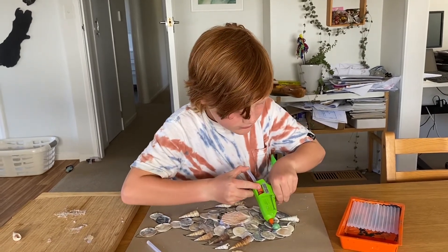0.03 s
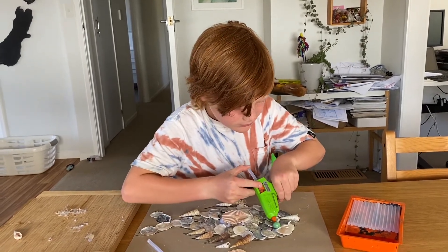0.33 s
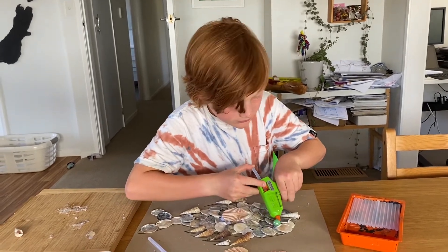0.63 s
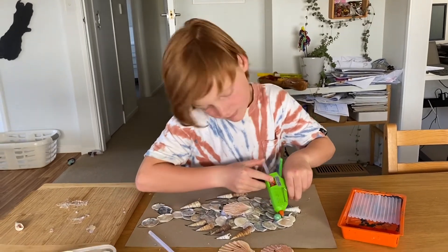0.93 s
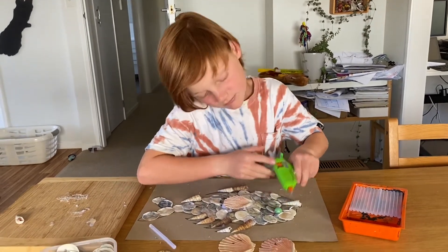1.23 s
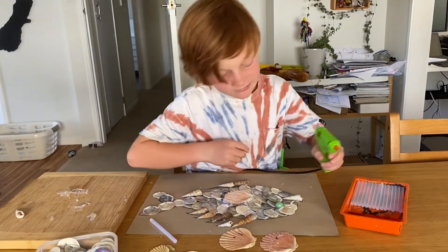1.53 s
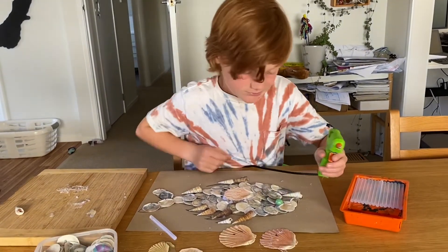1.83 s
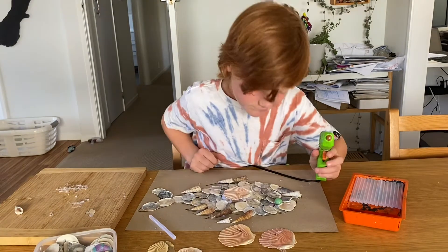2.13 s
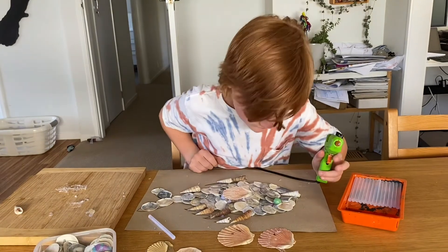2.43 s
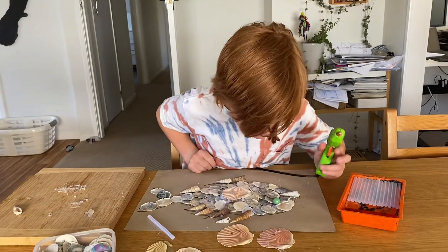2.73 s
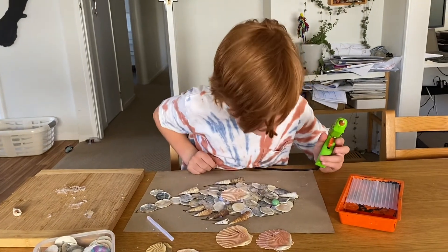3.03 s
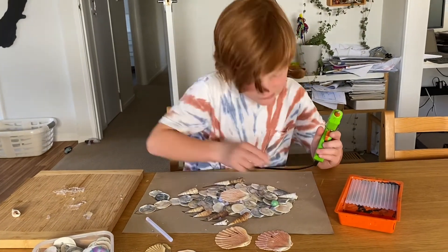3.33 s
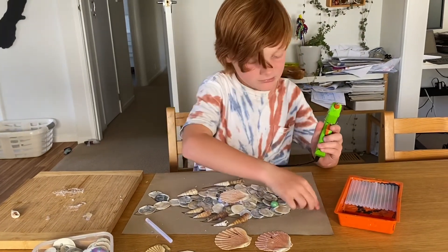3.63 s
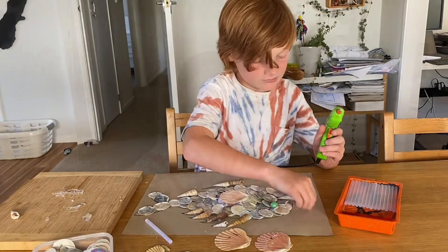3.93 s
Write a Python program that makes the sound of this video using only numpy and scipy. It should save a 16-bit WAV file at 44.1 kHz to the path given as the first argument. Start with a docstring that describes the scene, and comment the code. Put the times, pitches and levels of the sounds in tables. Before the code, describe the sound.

Glue gun handled with a click and table knocks, followed by light scraping of shells.

```python
"""Glue gun over a shell collage

A child handles a glue gun in a quiet living room; an appliance hums, a distant motor drones.
The plastic trigger clicks, the gun knocks twice on the wooden table, clothes rustle, then a hand
brushes the paper and nudges the shells. Hits are noise bursts and ringing modes; rubs are tiny slips."""
import sys
import numpy as np
from scipy import signal
from scipy.fft import rfft, irfft
from scipy.io import wavfile
from scipy.ndimage import uniform_filter1d

SR = 44100
rng = np.random.default_rng(int(sys.argv[2]) if len(sys.argv) > 2 else 0)


def store_wav(level_fs):
    """Save 16-bit WAV to argv[1]."""
    pcm = np.round(np.clip(np.atleast_2d(level_fs), -1, 1) * 32767)
    wavfile.write(sys.argv[1], SR, pcm.T.astype(np.int16))


N = 176400
TIME_S = np.arange(N) / SR

# Background noise spectra. Each row: frequency in Hz, density in dB per Hz.
AIR_SPECTRUM = [(28, -97), (42, -72), (60, -73), (90, -79), (130, -85), (180, -88), (260, -88), (400, -94),
                (600, -102), (1000, -108), (1550, -106), (1675, -103), (1800, -106), (2050, -109),
                (2600, -117), (4500, -117), (9000, -118), (11000, -122), (15500, -134)]
HISS_SPECTRUM = [(4000, -140), (5200, -114), (5900, -104), (7500, -103), (8500, -107), (9800, -124),
                 (12000, -140)]
# Left-right likeness of the noise. Each row: frequency in Hz, coherence from 0 to 1.
NOISE_COHERENCE = [(60, 1), (130, 0.7), (300, 0.83), (700, 0.39), (1500, 0.073), (3000, 0.45), (7000, 0.54)]
# Hiss and motor envelopes. Each row: time in seconds, gain in dB.
HISS_GAIN_DB = [(0, 0.5), (.4, -2), (.67, 3), (.8, -1), (1.25, 1.5), (1.33, -7.5), (1.55, -4.5),
                (2.05, 0.5), (2.17, -5), (2.65, 0), (2.85, -1.5), (3.05, 3.5), (3.17, -2), (3.32, 4),
                (3.41, -4.5), (3.5, 1.5), (4, -3.5)]
MOTOR_GAIN_DB = [(0, -43), (.3, -47.5), (.45, -58), (.56, -50), (.7, -40.5), (.85, -39), (1.25, -40.5),
                 (1.6, -45.5), (1.88, -43), (2.2, -49.5), (2.6, -48.5), (3.25, -45.5), (3.6, -63.5),
                 (3.8, -51.5), (4, -54.5)]
# Motor pitch. Each row: time in seconds, frequency in Hz.
MOTOR_PITCH_HZ = [(0, 54.88), (.5, 56.11), (.9, 57.22), (1.2, 56.93), (1.5, 57.59), (1.9, 57.48),
                  (2.2, 58.5), (2.9, 59), (3.15, 60.64), (4, 60.97)]

# Rubbing strokes. Each row: peak time, 1/e rise and 1/e fall in seconds, level in dB.
FINGER_STROKES = [(3.562, 0.0092, 0.023, -48)]
PAPER_STROKES = [(3.606, 0.035, 0.053, -54), (3.995, 0.028, 0.031, -67)]
SHELL_STROKES = [(3.705, 0.071, 0.079, -60), (3.74, 0.0079, 0.026, -64), (3.812, 0.012, 0.041, -59),
                 (3.886, 0.021, 0.019, -53.5), (3.915, 0.016, 0.0071, -54.5)]
# Sleeve strokes. Each row: as above, then low-pass cutoff in Hz.
SLEEVE_STROKES = [(.08, 0.07, .04, -67, 4890), (.26, 0.072, 0.033, -68, 6500),
                  (.35, 0.039, 0.021, -65, 3450), (0.449, 0.034, 0.021, -68, 8040),
                  (.86, 0.037, 0.13, -68, 7500), (1.36, 0.033, 0.027, -72, 9200),
                  (1.66, 0.11, 0.15, -64.5, 7960), (1.786, 0.054, 0.064, -60, 11100),
                  (2.7, 0.05, 0.063, -64, 4700), (2.85, 0.013, 0.093, -66.5, 10850),
                  (3.016, 0.028, 0.046, -61.5, 20270), (3.231, 0.067, 0.08, -70, 13500)]
# Arms on the table. Each row: start in seconds, level in dB, pitch in Hz.
ARM_BUMPS = [(0.824, -22.5, 128), (1.541, -22, 107), (1.785, -15, 78.7), (3.44, -16.5, 76.1)]
# Small ticks. Each row: start in seconds, level in dB, pitch in Hz, width in octaves.
SMALL_TICKS = [(.002, -26.5, 1840, 0.12), (0.217, -42.5, 1180, .2), (.29, -45.5, 4730, 0.25),
               (0.8278, -37.5, 3900, 0.62), (.988, -43, 1700, 0.57), (1.223, -45.5, 2080, 0.62),
               (1.449, -44.5, 4417, 0.34), (1.488, -45.5, 2080, 0.4)]
# Shell contacts. Each row: start in seconds, level in dB, pitch ratio.
SHELL_HITS = [(3.558, -27, 1.2), (3.706, -40, 1.5), (3.7296, -27.5, 1.02), (3.7927, -30.5, 1.08),
              (3.887, -32, 0.75), (3.915, -33, 1.03)]
# Gun on the table. Each row: start in seconds, body and edge levels in dB, body pitch ratio.
GUN_KNOCKS = [(2.3040, -23, -18.5, 2), (2.3066, -17, -22, 1.25), (2.3313, -20, -40, 0.91),
              (2.348, -20, -21, 1.13), (2.3490, -7.5, -23, 0.9), (2.361, -23.5, -38, 0.67),
              (2.376, -19.5, -36, 0.81)]
# Trigger contacts. Each row: start in seconds, level in dB, low-pass cutoff in Hz.
TRIGGER_CLICKS = [(1.5329, -13, 16700), (1.5369, -26, 8950), (1.549, -37, 6000), (2.222, -31.5, 7200)]

# Friction and impact spectra. Each row: frequency in Hz, relative level in dB.
CLOTH_SPECTRUM = [(200, 4), (800, -6), (1700, -0.5), (2500, -2), (4000, -1.5), (5200, -4), (7000, -5.5),
                  (11500, -1), (15000, -4.5)]
FINGER_SPECTRUM = [(200, -15), (550, 2), (800, -9), (1700, -1.5), (3200, 1), (4000, 0), (5200, -2),
                   (7000, -2.5), (9000, -4), (11500, -1), (15000, -9)]
PAPER_SPECTRUM = [(200, -8), (800, -4), (1100, 1), (1800, 1.5), (2500, 1), (3300, -4.5), (5200, -12.5),
                  (15000, -12)]
SHELL_SPECTRUM = [(300, -25), (1100, -19), (1700, -7), (2500, -15.5), (3200, 0), (4000, 0.5), (5200, -3.5),
                  (7000, -2.5), (9000, -2), (11500, 2), (15000, -2)]
KNOCK_BODY_SPECTRUM = [(60, -4), (160, -8), (350, -8), (560, 4), (800, 1), (1100, -5), (1700, -7),
                       (2500, -26), (4000, -19.5), (7000, -48)]
KNOCK_EDGE_SPECTRUM = [(200, -11), (600, -1), (1100, -5), (1950, 4), (2500, -6.5), (3200, -6), (4200, -13),
                       (5200, -15), (7000, -20.5), (9000, -20.5), (11500, -16.5), (15000, -22)]
PLASTIC_SPECTRUM = [(300, -32), (780, -13), (1060, 2.5), (1700, -3.5), (2500, -6.5), (3200, -7.5),
                    (4000, 2.5), (5200, -8), (7000, -7.5), (9000, -2), (11500, -6), (15000, -3)]
# Resonances. Each row: frequency in Hz, relative level in dB, T60 in seconds.
SHELL_MODES = [(3620, -4, .07), (4260, -3, 0.062), (3876, -1, 0.058), (4870, -6, 0.033), (6800, -7, 0.027),
               (11300, -2, 0.016)]
TABLE_MODES = [(215, -5, .16), (285, -4, .1), (480, 0, .11), (557, 1, .11), (630, 2, .1), (666, 0, .13),
               (750, -1, .11), (861, -1, .08), (940, -2, .08), (1120, 0, .1), (1440, -7, .08),
               (1830, -5, .06)]
PLASTIC_MODES = [(1060, 0, .05), (1180, 1, .07), (1270, -2, .06), (1580, 0, .05), (1782, -2, .05),
                 (3690, 2, .01), (3890, 3, .01), (4230, 4, .01)]

# Room decay. Each row: frequency in Hz, T60 in seconds.
REVERB_T60_S = [(150, .34), (600, .29), (2000, .33), (4000, .3), (12000, .26)]
# Reverb spectrum. Each row: frequency in Hz, gain in dB.
REVERB_GAIN_DB = [(100, -7), (600, -3.5), (1000, -1.5), (1600, -3), (3000, -3), (4000, -6), (5000, -2),
                  (7000, -1.5), (10000, -1), (15000, -20)]
# Direction of the hits. Each row: frequency in Hz, left phase lag in radians.
LEFT_LAG_RAD = [(400, 0.47), (750, 1.4), (1300, 1.5), (1900, 0.84)]
# Stereo width. Each row: frequency in Hz, side gain as a factor.
MIC_WIDTH = [(100, .55), (500, .85), (1100, 1.5), (2500, .6), (6000, .55), (7500, .2), (8800, .08),
             (15000, .1)]
# Stereo balance. Each row: frequency in Hz, left over right in dB.
MIC_BALANCE_DB = [(50, 2), (300, 4.5), (700, 3), (1300, 0), (2000, 0), (3000, 5.5), (4800, 5), (6200, 3.5),
                  (8500, 3.5), (15000, -2)]


def amp(db):
    """dB to amplitude."""
    return 10 ** (np.asarray(db) / 20)


def at_hz(table, hz):
    """Table lookup over log frequency."""
    row_hz, values = np.transpose(table)
    return np.interp(np.log(hz + 1), np.log(row_hz + 1), values)


def over_time(table):
    """Table interpolated per sample."""
    return np.interp(TIME_S, *np.transpose(table))


def shifted(table, ratio):
    """Table with frequencies scaled."""
    return [(hz * ratio, *rest) for hz, *rest in table]


def unit(x):
    """Scale to energy 1."""
    return x / np.sqrt(np.sum(x ** 2, -1, keepdims=True) + 1e-20)


def add(mix, start_s, sound):
    """Mix in place."""
    part = mix[max(round(start_s * SR), 0):][:len(sound)]
    part += sound[:len(part)]


def lowpass(x, cutoff_hz):
    """Second-order treble roll-off."""
    return signal.lfilter(*signal.butter(2, min(cutoff_hz, SR / 2 - 500), fs=SR), x)


def colour(x, spectrum, size=2048):
    """Minimum-phase filter of energy 1."""
    log_gain = np.log(amp(at_hz(spectrum, abs(np.fft.fftfreq(size, 1 / SR)))))
    taps = np.fft.ifft(np.exp(np.conj(signal.hilbert(log_gain)))).real
    return signal.fftconvolve(x, unit(taps))[:len(x)]


def burst(spectrum, decay_s):
    """Contact chatter: milliseconds of noise, whitened, then coloured; energy 1."""
    age = TIME_S[:SR // 2] / decay_s
    bins = rfft(rng.standard_normal(len(age)) * np.sqrt(age) * np.exp(-1.3 * age))
    chatter = irfft(bins / abs(bins), len(age)) * np.exp(-.3 * age)
    return unit(colour(chatter, spectrum))


def ring(modes):
    """Decaying modes of a struck object; energy 1."""
    t = TIME_S[:SR // 2]
    return unit(sum(rng.choice([-1, 1]) * amp(db - 60 * t / t60_s) * np.sin(2 * np.pi * hz * t)
                    for hz, db, t60_s in modes))


def friction(strokes, spectrum, slips_per_s, spread_db, catch_db, catch_s=0.0065):
    """Tiny uneven slips, clumped as the surface catches and lets go."""
    slips = rng.standard_normal(N) * amp(spread_db * np.minimum(rng.exponential(1, N), 4))
    slips *= rng.random(N) < slips_per_s / SR
    slips *= amp(catch_db * np.interp(TIME_S / catch_s, np.arange(N), rng.uniform(-1.03, 1, N)))
    power = sum(amp(db) ** 2 * np.exp(-2 * np.maximum((peak_s - TIME_S) / rise_s, (TIME_S - peak_s) / fall_s))
                for peak_s, rise_s, fall_s, db in strokes)
    return colour(unit(slips) * np.sqrt(N * power), spectrum)


def room_noise(spectrum, patch_db, steady_below_hz=900):
    """Stereo noise with faint drifting patches, steadier in the bass."""
    hz, _, (left, spare) = signal.stft(rng.standard_normal((2, N)), SR, nperseg=2048)
    coherence = np.clip(at_hz(NOISE_COHERENCE, hz), 0, 1)[:, None]
    right = coherence * left + np.sqrt(1 - coherence ** 2) * spare
    patches = uniform_filter1d(uniform_filter1d(rng.standard_normal(left.shape), 50, 0), 9, 1)
    depth_db = patch_db * np.minimum(hz / steady_below_hz, 1)[:, None]
    gain = amp(at_hz(spectrum, hz)[:, None] + depth_db * patches / patches.std())
    return signal.istft(np.array([left, right]) * gain, SR, nperseg=2048)[1][:, :N] * np.sqrt(SR / 2)


def whine(pitch_hz=1673, half_width_hz=6, level_db=-80, fade_db_per_s=1.5):
    """Faint wavering tone of narrow-band noise."""
    peak = 1 / (1 + ((np.fft.rfftfreq(N, 1 / SR) - pitch_hz) / half_width_hz) ** 2)
    band = unit(irfft(rfft(rng.standard_normal(N)) * peak, N))
    return amp(level_db - fade_db_per_s * TIME_S) * np.sqrt(N) * band


def motor_drone():
    """Distant motor: a deep sine, slowly rising in pitch."""
    phase_rad = 2 * np.pi * np.cumsum(over_time(MOTOR_PITCH_HZ)) / SR
    return np.sqrt(2) * amp(over_time(MOTOR_GAIN_DB)) * np.sin(phase_rad)


def appliance_hum(pitch_hz=48.84, level_db=-52.5, throb_hz=1.73, throb_depth=0.45):
    """Throbbing sine that beats against the drone."""
    throb = 1 + throb_depth * np.cos(2 * np.pi * throb_hz * TIME_S)
    return np.sqrt(2) * amp(level_db) * throb * np.sin(2 * np.pi * pitch_hz * TIME_S)


def reverb(x, early_db, wet_db, early_s=0.0061, gap_s=0.00151):
    """Quick table reflections and a short diffuse tail, different per side."""
    t = TIME_S[:SR // 2]
    onset = np.clip(t / gap_s - 1, 0, 1) * (1 + amp(early_db) * np.exp(-t / early_s))
    bins = rfft(rng.standard_normal((2, len(t))) * np.exp(-t / .06))
    diffuse = irfft(bins / abs(bins), len(t))
    diffuse /= np.sqrt(uniform_filter1d(diffuse ** 2, size=800, axis=1))  # flat envelope
    hz, age_s, frames = signal.stft(diffuse, SR, nperseg=256)
    frames *= amp(-60 * age_s / at_hz(REVERB_T60_S, hz)[:, None])
    tails = unit(signal.istft(frames, SR, nperseg=256)[1][:, :len(t)] * onset)
    rms_gain = np.sqrt(np.mean(amp(at_hz(REVERB_GAIN_DB, np.linspace(0, SR / 2, 512))) ** 2))
    wet = np.array([signal.fftconvolve(x, colour(tail, REVERB_GAIN_DB))[:N] for tail in tails])
    return amp(wet_db) * rms_gain * wet


def from_right(x):
    """Direct sound reaches the right side first."""
    lag_rad = at_hz(LEFT_LAG_RAD, np.fft.rfftfreq(2 * N, 1 / SR))
    left = irfft(rfft(x, 2 * N) * np.exp(-1j * lag_rad))[:N]
    return np.array([left, x])


def sleeve_rustle():
    """Cloth friction, low-passed per stroke."""
    out = np.zeros(N)
    for *stroke, cutoff_hz in SLEEVE_STROKES:
        rustle = friction([stroke], CLOTH_SPECTRUM, slips_per_s=9000, spread_db=2, catch_db=6)
        out += lowpass(rustle, cutoff_hz)
    return out


def hand_on_collage():
    """Fingers land and drag on paper; shells scrape."""
    brush = friction(FINGER_STROKES, FINGER_SPECTRUM, slips_per_s=10000, spread_db=1.5, catch_db=4)
    drag = friction(PAPER_STROKES, PAPER_SPECTRUM, slips_per_s=3500, spread_db=0, catch_db=3)
    scrape = friction(SHELL_STROKES, SHELL_SPECTRUM, slips_per_s=5400, spread_db=0, catch_db=1)
    return brush + drag + scrape


def arm_bumps(decay_s=0.011):
    """Arms meet the table: soft, low damped sines."""
    out, t = np.zeros(N), TIME_S[:SR // 3]
    for start_s, db, hz in ARM_BUMPS:
        add(out, start_s, amp(db) * unit(t * np.exp(-t / decay_s) * np.sin(2 * np.pi * hz * t)))
    return out


def small_ticks(skirt_db=-21):
    """A brief 1.8 kHz ring at the start, then light taps: bursts with one spectral peak."""
    out = np.zeros(N)
    for start_s, db, hz, width_oct in SMALL_TICKS:
        peak = [(hz / 4 ** width_oct, skirt_db), (hz, 0), (hz * 4 ** width_oct, skirt_db)]
        add(out, start_s, amp(db) * lowpass(burst(peak, decay_s=0.0014), 2 * hz))
    return out


def shell_ticks():
    """Shells touch: gritty contact, high ring."""
    out = np.zeros(N)
    for start_s, db, ratio in SHELL_HITS:
        tick = burst(SHELL_SPECTRUM, decay_s=0.00087) + amp(-4) * ring(shifted(SHELL_MODES, ratio))
        add(out, start_s, amp(db) * tick)
    return out


def gun_knocks():
    """Gun strikes wood: dull thud, table modes, hard edge."""
    out = np.zeros(N)
    for start_s, body_db, edge_db, ratio in GUN_KNOCKS:
        thud = burst(shifted(KNOCK_BODY_SPECTRUM, ratio), decay_s=0.0025)
        body = amp(-3) * thud + amp(-9) * ring(TABLE_MODES)
        edge = burst(KNOCK_EDGE_SPECTRUM, decay_s=0.0014)
        add(out, start_s, amp(body_db) * body + amp(edge_db) * edge)
    return out


def trigger_clicks():
    """The trigger snaps; the plastic housing rings."""
    out = np.zeros(N)
    for start_s, db, cutoff_hz in TRIGGER_CLICKS:
        click = burst(PLASTIC_SPECTRUM, decay_s=0.0013) + amp(-14) * ring(PLASTIC_MODES)
        add(out, start_s, amp(db) * lowpass(click, cutoff_hz))
    return out


def scene():
    """Hits and rubs in the room, over hum and noise; stereo."""
    hits = trigger_clicks() + small_ticks() + gun_knocks() + arm_bumps() + shell_ticks()
    rubs = sleeve_rustle() + hand_on_collage()
    reflections = reverb(hits, early_db=-4, wet_db=2) + reverb(rubs, early_db=9, wet_db=4)
    tones = whine() + motor_drone() + appliance_hum()
    air = room_noise(AIR_SPECTRUM, patch_db=2.3)
    hiss = amp(over_time(HISS_GAIN_DB)) * room_noise(HISS_SPECTRUM, patch_db=1.3)
    return from_right(hits) + rubs + reflections + tones + air + hiss


def record(dry):
    """Microphone pair: width, balance, treble phase twist, band limit."""
    twist_from_hz, hz_per_turn, cutoff_hz = 7000, 4250, 15800
    hz = np.fft.rfftfreq(2 * N, 1 / SR)
    left, right = rfft(dry, 2 * N)
    mid, side = (left + right) / 2, (left - right) / 2 * at_hz(MIC_WIDTH, hz)
    twist_rad = np.pi * np.maximum(hz - twist_from_hz, 0) / hz_per_turn
    lean = amp(at_hz(MIC_BALANCE_DB, hz) / 2) * np.exp(-1j * twist_rad)
    pair = irfft(np.array([(mid + side) * lean, (mid - side) / lean]))[:, :N]
    taps = signal.firwin(401, cutoff_hz, window=("kaiser", 8), fs=SR)
    return signal.oaconvolve(pair, taps[None], "same")


dry = scene()
out = record(dry)
store_wav(out)
```